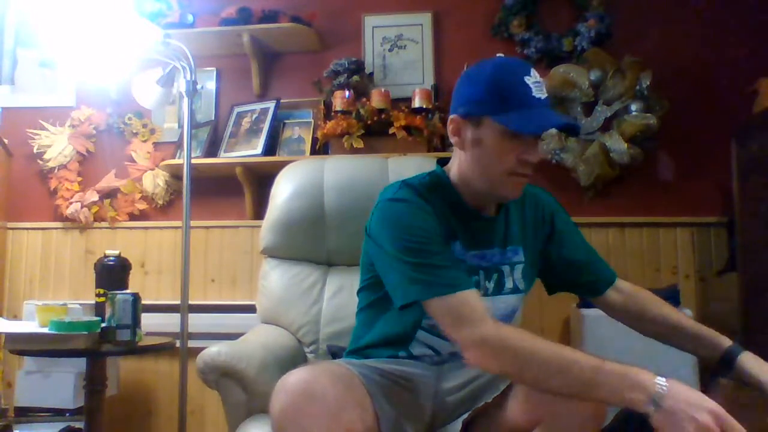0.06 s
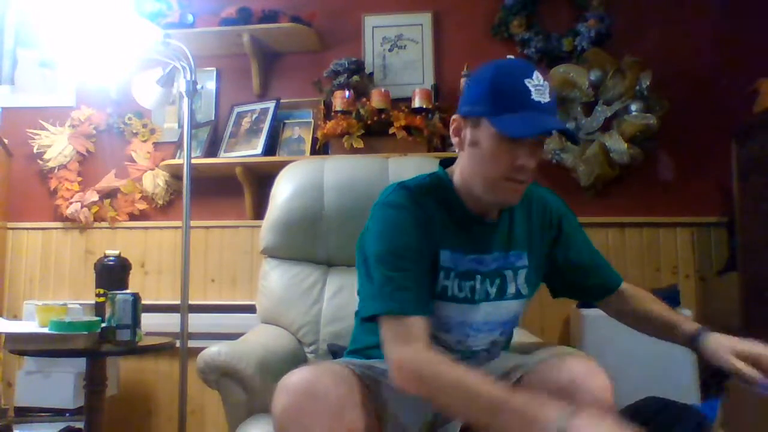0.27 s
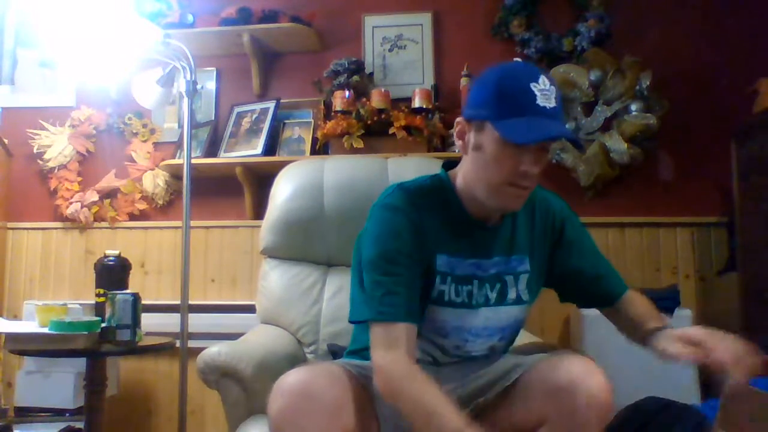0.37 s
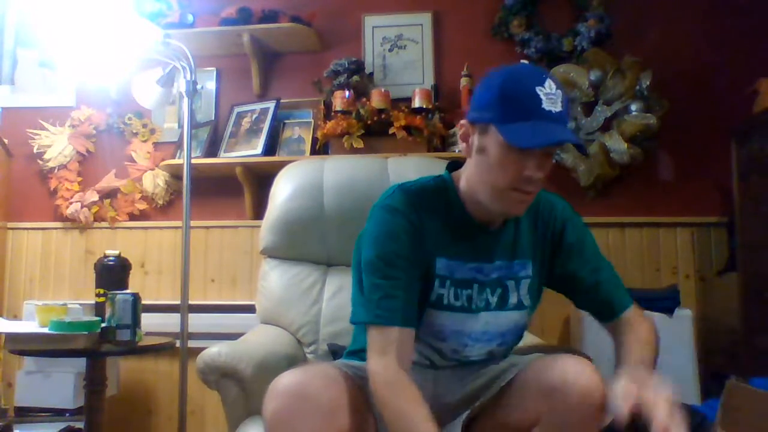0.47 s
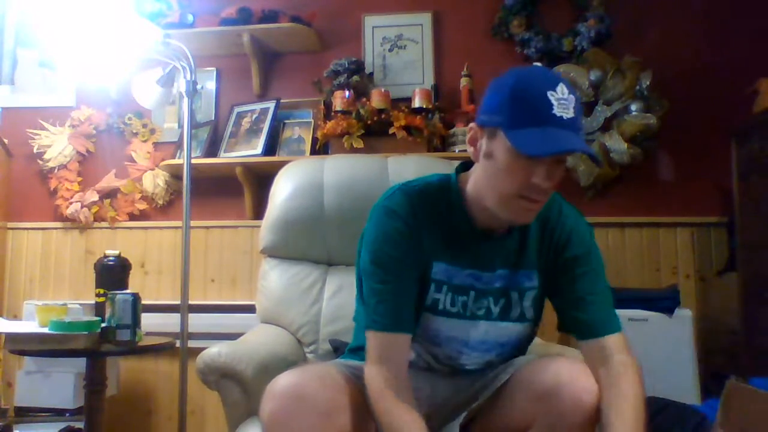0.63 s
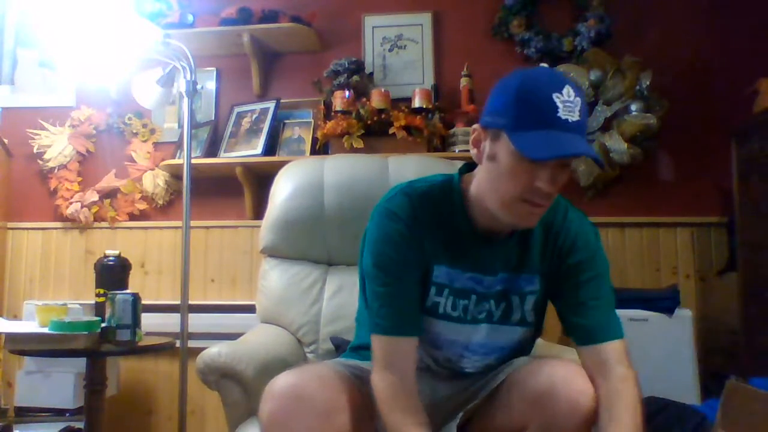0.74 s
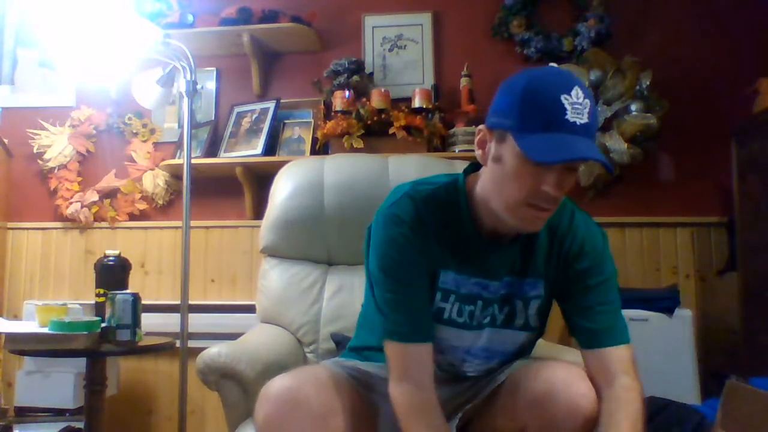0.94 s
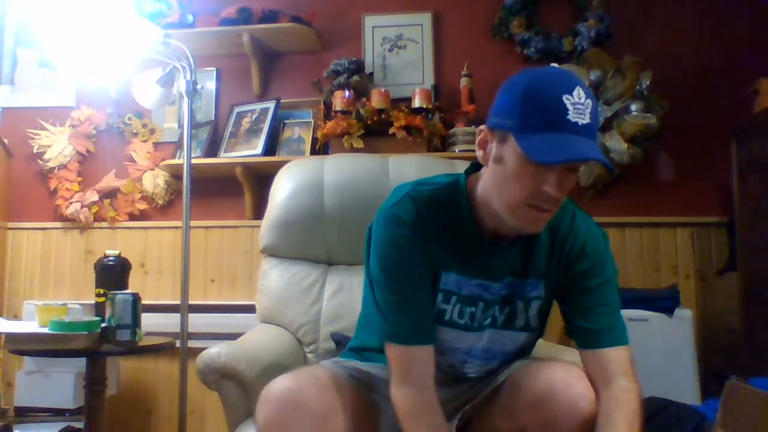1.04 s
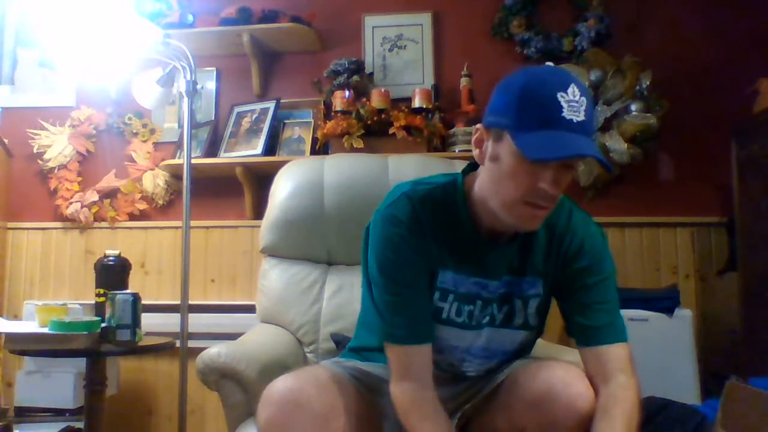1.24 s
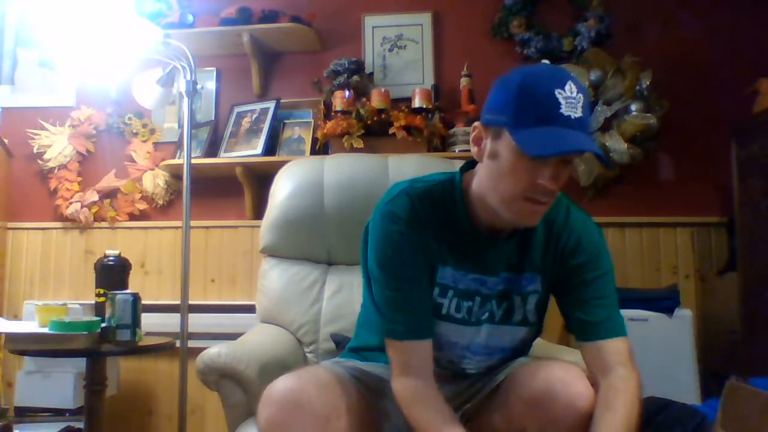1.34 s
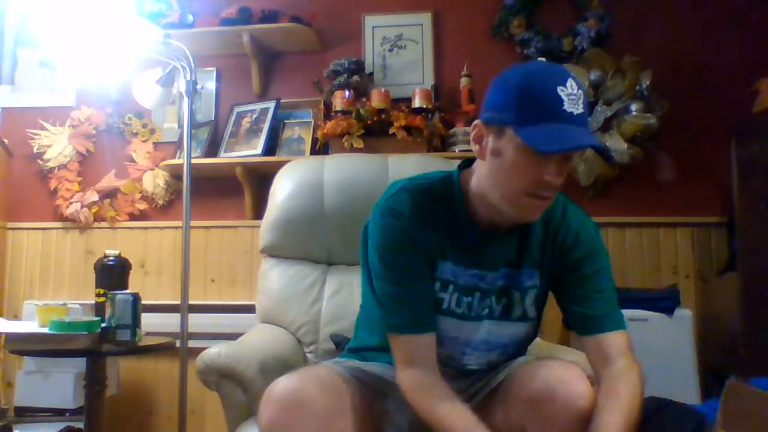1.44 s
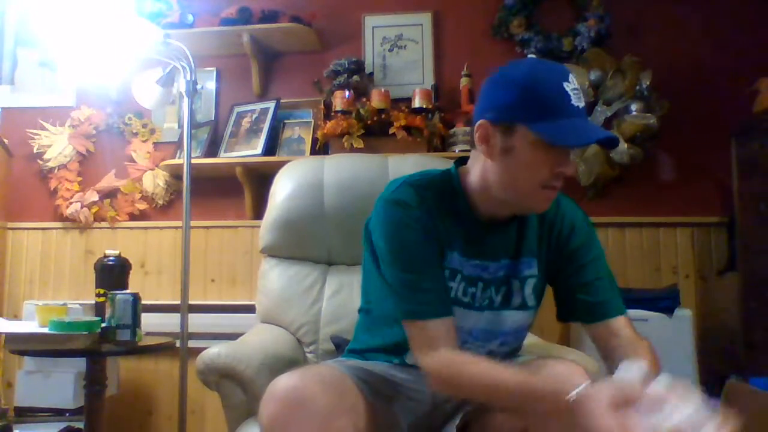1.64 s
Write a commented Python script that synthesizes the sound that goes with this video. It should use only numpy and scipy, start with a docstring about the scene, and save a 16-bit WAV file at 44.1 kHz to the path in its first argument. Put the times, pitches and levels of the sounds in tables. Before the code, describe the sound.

Foam packing pieces rustle in a cardboard box. The box scuffs and lands with a hollow thump, then hands brush the foam and dig in with a dense, bright crackle and crunch, close to the microphone in a small room.

```python
"""Foam packing peanuts worked by hand in a cardboard box, on one close microphone in a small room.
A flap is rubbed; the box slides and lands with a hollow thump that shakes the foam. The hands brush
the top, then dig in: countless tiny slips make a dense crackle, with a lower crunch under pressure,
a few snaps and scrunches and one short squeak. Behind it lie quiet room tone and a faint whine."""
import sys
import numpy as np
from scipy import signal
from scipy.fft import rfft, irfft, next_fast_len
from scipy.io import wavfile
from scipy.ndimage import uniform_filter1d

SR = 44100
rng = np.random.default_rng(int(sys.argv[2]) if len(sys.argv) > 2 else 0)


def output_pcm(signal):
    """Save a mono or channel-first signal as 16-bit PCM at the path in sys.argv[1].

    Samples are clipped to [-1, 1] before scaling.
    """
    pcm = np.clip(np.atleast_2d(signal).T, -1, 1) * 32767
    wavfile.write(sys.argv[1], SR, np.round(pcm).astype(np.int16))


N = 74970

# spectrum of foam slipping or snapping: frequency_hz, level_db
FOAM_SPECTRUM = [(880, -34), (1500, 0), (1860, -12.5), (2260, -3), (2920, -6), (3220, -9), (3770, -1),
                 (4630, 0), (8920, -4), (10400, -3), (11300, -9.5), (11700, -30.5), (12500, -51),
                 (16200, -78), (22000, -120)]


def amp(db):
    """Decibels to gain."""
    return 10 ** (np.asarray(db) / 20)


def unit(x):
    """Scale to rms 1."""
    return x / np.sqrt(np.mean(x ** 2) + 1e-20)


def along(points, hz):
    """Read a curve of (frequency_hz, value) points on a log frequency axis."""
    point_hz, values = np.transpose(points)
    return np.interp(np.log(hz + 1), np.log(point_hz + 1), values)


def clock():
    """Time of each sample in seconds."""
    return np.arange(N) / SR


def filtered(x, response):
    """Filter x by a response given as a function of frequency."""
    size = next_fast_len(N + SR // 2)
    return irfft(rfft(x, size) * response(np.fft.rfftfreq(size, 1 / SR)), size)[:N]


def coloured(x, spectrum):
    """Shape x by (frequency_hz, level_db) points, at rms 1."""
    return unit(filtered(x, lambda hz: amp(along(spectrum, hz))))


def swells(strokes):
    """Gain of strokes (peak_s, rise_s, fall_s, level_db); rise and fall each span 20 dB."""
    t, power = clock(), np.zeros(N)
    for peak_s, rise_s, fall_s, level_db in strokes:
        drop_db = 20 * np.where(t < peak_s, ((peak_s - t) / rise_s) ** 2, (t - peak_s) / fall_s)
        power += amp(level_db - drop_db) ** 2
    return np.sqrt(power)


def struck(start_s, attack_s, t60_s):
    """Envelope of a blow: a quick rise, then an exponential decay."""
    age = np.maximum(clock() - start_s, 0)
    return (1 - np.exp(-age / attack_s)) * amp(-60 * age / t60_s)


def grains(per_s, lo_hz, hi_hz, life_s, spread_db):
    """A stream of tiny damped rings of random pitch and size, rms 1."""
    onset, pitch, strength, life, phase = np.hsplit(rng.random((int(per_s * N / SR), 5)), 5)
    t = np.arange(SR // 200) / SR
    hz = lo_hz + (hi_hz - lo_hz) * pitch
    size = amp(-spread_db * np.log(.02 + .98 * strength))
    rings = size * np.sin(2 * np.pi * (hz * t + phase)) * np.exp(-t / (life_s * (.5 + life)))
    samples = (onset * N).astype(int) + np.arange(len(t))
    return unit(np.bincount(samples.ravel(), rings.ravel())[:N])


def resonant(peaks):
    """Rubbing noise through resonances (pitch_hz, width_hz, level_db), rms 1."""
    def response(hz):
        return sum(amp(db) * 1j * hz * width / (pitch ** 2 - hz ** 2 + 1j * hz * width)
                   for pitch, width, db in peaks)
    return unit(filtered(rng.standard_normal(N), response))


def room_tone():
    """The quiet, steady air of the room."""
    # noise floor: frequency_hz, level_db
    air_spectrum = [(25, -20), (55, -21), (90, 1), (180, -7.5), (300, -3), (420, -13), (1000, -9.5),
                    (2000, -17), (5000, -22.5), (11000, -27.5)]
    return amp(-57) * coloured(rng.standard_normal(N), air_spectrum)


def whine(pitch_hz=3430, level_db=-70):
    """A faint, steady electrical whine."""
    return amp(level_db) * np.sqrt(2) * np.sin(2 * np.pi * pitch_hz * clock())


def room(x, wet_db):
    """Direct sound plus a short tail off the walls, whose treble dies first."""
    # reverberation time: frequency_hz, t60_s
    decay_times = [(100, 0.47), (300, 0.39), (1000, 0.16), (4000, 0.12), (11000, 0.15)]
    hz, t, bands = signal.stft(rng.standard_normal(SR // 2), SR, nperseg=256)
    decay = amp(-60 * t / along(decay_times, hz)[:, None])
    tail = signal.istft(bands * decay, SR, nperseg=256)[1]
    delayed = np.pad(x, (SR // 300, 0))
    wet = signal.fftconvolve(delayed, tail / np.linalg.norm(tail))[:N]
    return (x + amp(wet_db) * wet) / np.sqrt(1 + amp(wet_db) ** 2)


def flap_rubs():
    """A hand drags over a cardboard flap, which sings faintly."""
    # hand strokes: peak_s, rise_s, fall_s, level_db
    strokes = [(.11, 0.1, 0.22, -44.5), (.18, 0.084, 0.16, -41.5)]
    # resonances of the flap: pitch_hz, width_hz, level_db
    flap_modes = [(778, 76, -1.5), (1530, 66, -4), (2616, 63, -2.5), (3780, 140, -11.5), (5350, 88, -11),
                  (5540, 49, -2.5)]
    return swells(strokes) * resonant(flap_modes)


def box_slides():
    """Cardboard scuffs around the landing and when the hands push against the box."""
    # scuffs: peak_s, rise_s, fall_s, level_db
    scuffs = [(.04, 0.075, 0.33, -48), (.208, 0.027, 0.028, -31.5), (.36, 0.05, 0.15, -42.5),
              (.485, 0.057, 0.085, -46.5), (.57, 0.034, 0.17, -44.5), (.81, 0.088, 0.074, -45.5)]
    # sliding cardboard: frequency_hz, level_db
    scuff_spectrum = [(50, -16), (90, -4), (200, 1), (320, -2), (520, -1.5), (700, -3), (860, -3),
                      (1050, 0.5), (1250, -7.5), (1500, -7), (1900, -9), (3000, -32), (8000, -45)]
    friction = grains(per_s=2500, lo_hz=50, hi_hz=3080, life_s=0.0011, spread_db=0.0)
    return swells(scuffs) * coloured(friction, scuff_spectrum)


def box_landing():
    """Each edge of the box lands with a papery slap and rings its hollow walls."""
    # edges meeting the floor: start_s, ring_db, slap_db
    blows = [(0.2104, -21, -19.5), (0.2212, -13.5, -32.5), (0.2376, -16, -34.5), (0.274, -34.5, -28.5),
             (.314, -28, -43)]
    # modes of the box: pitch_hz, level_db, t60_s
    box_modes = [(96.6, -17, 0.4), (118.1, -18.5, 0.5), (171, -20, 0.52), (196.5, -11, 0.4),
                 (229, -6, 0.22), (251.3, 1.2, 0.18), (311.2, -11, 0.48), (328.8, -17, 1),
                 (394.4, -19, .35), (473, -22, .33), (721, -12.5, 0.13), (760, -11.5, 0.17),
                 (878, -19.5, 0.18), (1163, -17.5, 0.21)]
    # papery slap: frequency_hz, level_db
    slap_spectrum = [(25, -22), (60, -12), (100, -2.5), (250, 5), (420, -4), (600, -2.5), (750, 4),
                     (950, -9.5), (1200, -6), (1600, -13.5), (2400, -13), (3300, -43), (8000, -45)]
    t, out = clock(), np.zeros(N)
    for start_s, ring_db, slap_db in blows:
        for pitch_hz, level_db, t60_s in box_modes:
            gain = amp(ring_db + level_db + rng.normal(0, 1))
            tone = np.sin(2 * np.pi * pitch_hz * (t - start_s))
            out += gain * struck(start_s, attack_s=0.0011, t60_s=t60_s) * tone
        slap = coloured(rng.standard_normal(N), slap_spectrum)
        out += amp(slap_db) * struck(start_s, attack_s=0.00073, t60_s=0.21) * slap
    return out


def foam_squeak(glide=.04, jitter=0.017):
    """Foam sticks and slips on foam in a high, unsteady, rising tone."""
    # the squeak's two chirps: start_s, length_s, pitch_hz, level_db
    chirps = [(1.4, 0.0065, 8150, -21), (1.406, 0.0078, 8480, -24)]
    out = np.zeros(N)
    for start_s, length_s, pitch_hz, level_db in chirps:
        progress = np.clip((clock() - start_s) / length_s, 0, 1)
        wobble = unit(uniform_filter1d(rng.standard_normal(N), size=20))
        hz = pitch_hz * (1 + glide * (progress - .5) + jitter * wobble)
        tone = np.sqrt(2) * np.sin(2 * np.pi * np.cumsum(hz) / SR)
        out += amp(level_db) * np.sin(np.pi * progress) * tone
    return out


def foam_scrunches(q=5.3):
    """A few pieces squeezed together chatter in a narrow band."""
    # squeezes: peak_s, rise_s, fall_s, level_db, pitch_hz
    squeezes = [(.963, .014, .025, -32, 4600), (.99, 0.032, .025, -29.5, 2250),
                (1.268, .008, .02, -28, 5160), (1.415, .008, 0.027, -35, 4970)]
    return sum(swells([stroke]) * resonant([(hz, hz / q, 0)]) for *stroke, hz in squeezes)


def foam_snaps():
    """Now and then one piece gives way with a sharp tick."""
    # pieces snapping: start_s, level_db
    snaps = [(0.849, -23), (0.943, -15), (0.968, -27), (1.044, -27), (1.163, -25)]
    ticks = sum(amp(db) * struck(start_s, attack_s=.0001, t60_s=0.0059) for start_s, db in snaps)
    return ticks * coloured(rng.standard_normal(N), FOAM_SPECTRUM)


def foam_rustle(fade_in_s=0.027, low_cut_hz=2350, crackle_trim_db=.5, crunch_trim_db=-0.5):
    """Pieces rub in countless tiny slips: a bright crackle, and a lower crunch when pressed."""
    # light brushes over the foam: peak_s, rise_s, fall_s, crackle_db, crunch_db
    brushes = [(0.051, 0.055, 0.12, -47.5, -50), (.116, 0.076, 0.1, -38.5, -48.5),
               (0.22, 0.028, 0.11, -31, -35), (.274, .045, 0.063, -37.5, -33),
               (.557, 0.014, 0.11, -30, -48), (0.624, 0.0082, 0.065, -33, -48)]
    # level curves of the hands digging: time_s, crackle_db, crunch_db
    digging = [(0.69, -55.5, -76), (0.722, -40.5, -73), (0.78, -36, -42.5), (0.798, -27, -37),
               (0.844, -27, -34.5), (0.878, -30.5, -38.5), (0.968, -26.5, -31), (1.052, -35.5, -38.5),
               (1.086, -35, -46), (1.096, -36.5, -34), (1.158, -28.5, -36), (1.232, -34, -39.5),
               (1.26, -30, -39), (1.392, -35, -42), (1.404, -28.5, -51.5), (1.44, -30.5, -41.5),
               (1.502, -34, -42), (1.578, -45, -51), (1.612, -36, -47), (1.632, -41.5, -48.5),
               (1.66, -47.5, -57.5), (1.7, -54, -57)]
    t = clock()
    time_s, crackle_db, crunch_db = np.transpose(digging)
    fade_in = np.clip((t - time_s[0]) / fade_in_s + 1, 0, 1)
    dig_crackle = fade_in * amp(np.interp(t, time_s, crackle_db))
    dig_crunch = fade_in * amp(np.interp(t, time_s, crunch_db))
    brush_crackle = swells([(*timing, db) for *timing, db, _ in brushes])
    brush_crunch = swells([(*timing, db) for *timing, _, db in brushes])

    light_slips = grains(per_s=12000, lo_hz=970, hi_hz=11760, life_s=0.00067, spread_db=2.0)
    crackle = coloured(light_slips, FOAM_SPECTRUM)
    crackle = unit(filtered(crackle, lambda hz: hz ** 2 / np.hypot(hz ** 2, low_cut_hz ** 2)))
    # foam under pressure: frequency_hz, level_db
    crunch_spectrum = [(50, -24), (95, -8), (200, -8.5), (300, -7), (400, -11.5), (600, -5.5), (900, -3),
                       (1300, -1.5), (1700, -1), (2250, 0.5), (2900, -3.5), (3400, -9), (6000, -11),
                       (12000, -47)]
    pressed_slips = grains(per_s=5000, lo_hz=50.3, hi_hz=4630, life_s=0.0013, spread_db=1.0)
    crunch = coloured(pressed_slips, crunch_spectrum)
    return (amp(crackle_trim_db) * crackle * np.hypot(brush_crackle, dig_crackle)
            + amp(crunch_trim_db) * crunch * np.hypot(brush_crunch, dig_crunch))


def scene():
    """Foam and box close by, more direct sound than room, over room tone and whine."""
    background = room_tone() + whine()
    foam = room(foam_rustle() + foam_snaps() + foam_squeak() + foam_scrunches(), wet_db=-10.5)
    cardboard = room(box_landing() + box_slides() + flap_rubs(), wet_db=-12)
    return (background + cardboard + foam)[None]


def record(dry):
    """The mono microphone loses the deep bass and everything above its band limit."""
    low_cut_hz, top_hz = 68, 11700
    high_pass = lambda hz: (1j * hz) ** 2 / (low_cut_hz ** 2 - hz ** 2 + 1j * hz * low_cut_hz)
    low_pass = lambda hz: 1 / np.sqrt(1 + (hz / top_hz) ** 120)
    return filtered(dry[0], lambda hz: high_pass(hz) ** 2 * low_pass(hz))[None]


dry = scene()
out = record(dry)
output_pcm(out)
```